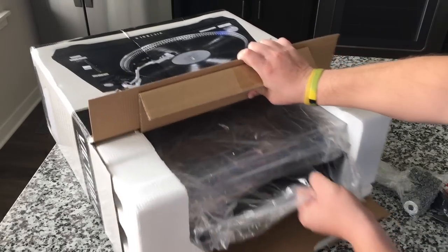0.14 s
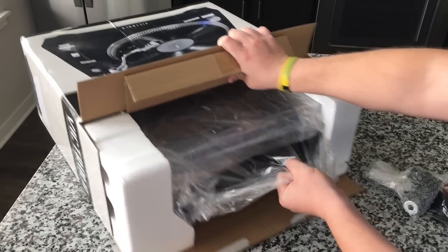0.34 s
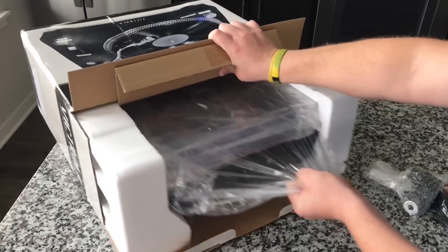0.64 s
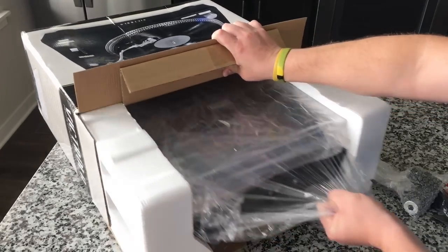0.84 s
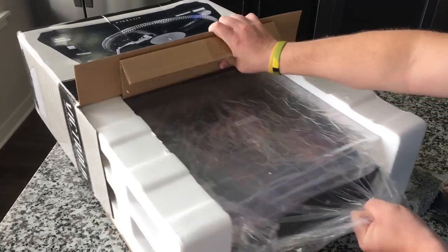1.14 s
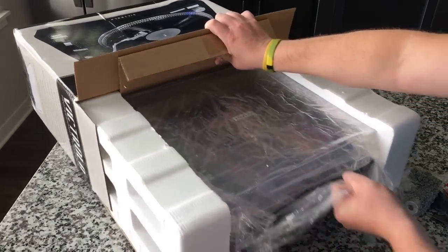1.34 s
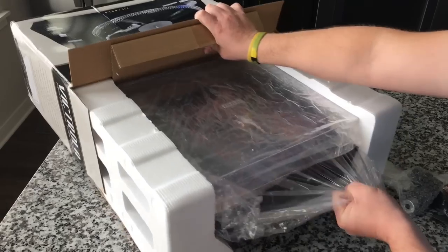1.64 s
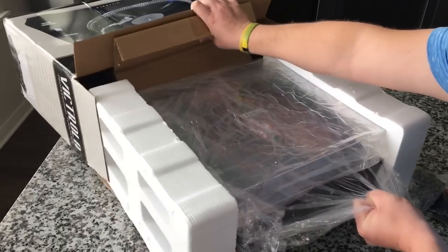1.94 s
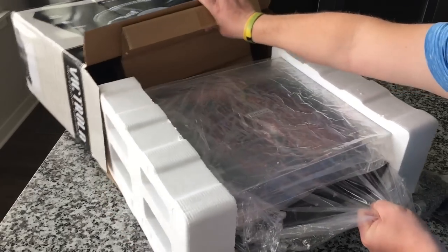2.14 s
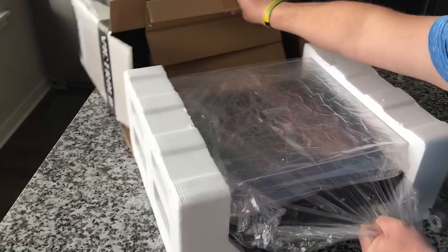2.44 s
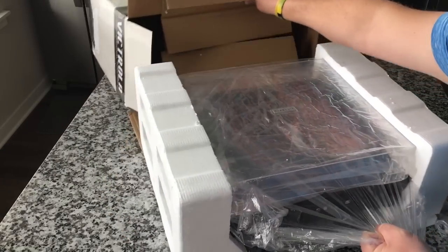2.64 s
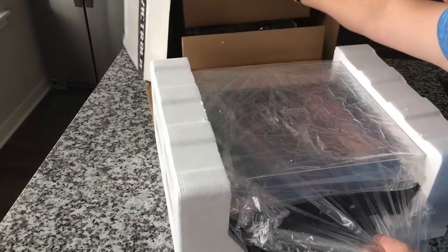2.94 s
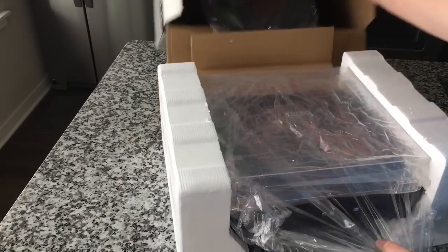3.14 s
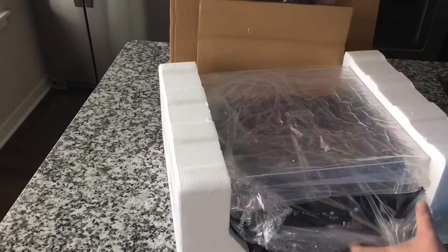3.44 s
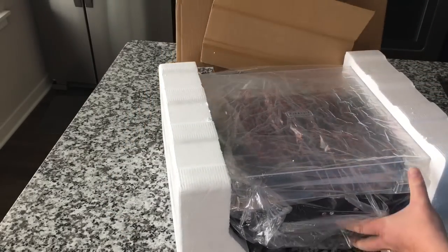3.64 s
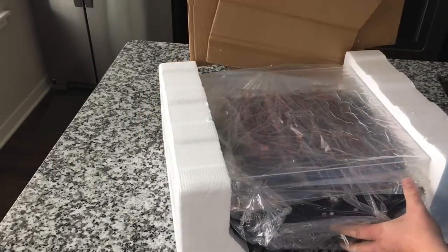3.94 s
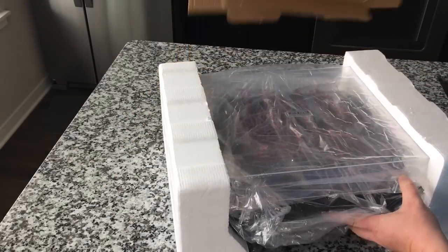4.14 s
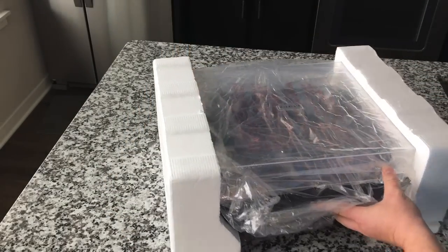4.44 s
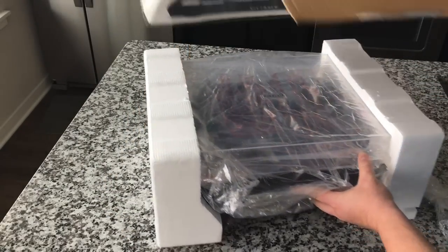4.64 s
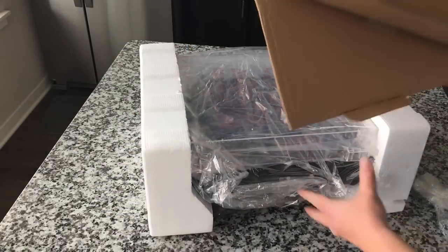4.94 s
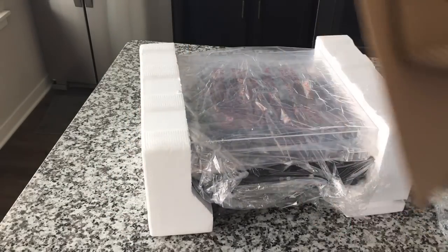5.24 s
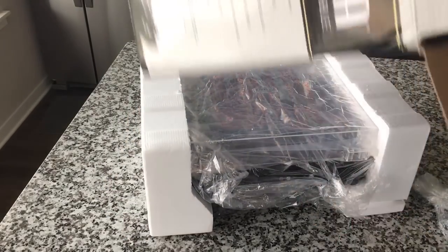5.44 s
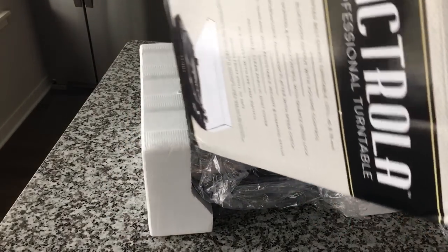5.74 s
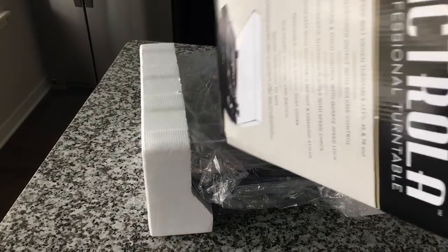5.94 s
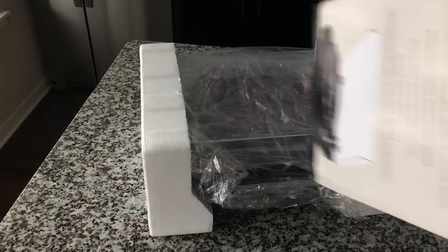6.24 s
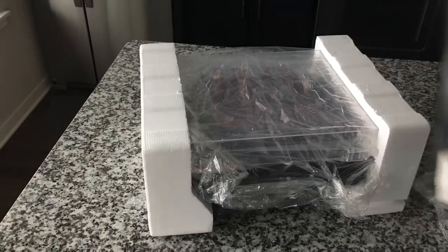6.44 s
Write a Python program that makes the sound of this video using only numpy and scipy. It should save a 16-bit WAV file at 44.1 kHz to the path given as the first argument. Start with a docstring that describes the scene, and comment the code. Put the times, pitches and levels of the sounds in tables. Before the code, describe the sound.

Cardboard and foam rub and hiss, then crack and bump as a plastic-wrapped item slides free, followed by rustling.

```python
"""Foam end caps hiss and crack as a turntable is pulled out of a cardboard box on a stone counter.
Sliding friction makes the hiss; stuck foam lets go in sharp cracks, and the load rings as it drops.
Creases snap through in its plastic film, and the box judders in stick-slip and is bumped as it is
lifted away. A kitchen reverberates behind."""
import sys
import numpy as np
from scipy import signal
from scipy.fft import rfft, irfft
from scipy.io import wavfile
from scipy.ndimage import uniform_filter1d

SR = 44100
rng = np.random.default_rng(int(sys.argv[2]) if len(sys.argv) > 2 else 0)


def dump_mix(stems):
    """Bounce the given channels to the path in sys.argv[1] as a 16-bit WAV at rate SR."""
    frames = np.atleast_2d(stems).T  # one column per channel
    limited = np.clip(frames, -1, 1)  # hard clip at full scale
    pcm = np.round(limited * 32767).astype(np.int16)
    wavfile.write(sys.argv[1], SR, pcm)


N = 290619
TIME = np.arange(N) / SR
GRIP_RISE_S, GRIP_FALL_S = 0.022, 0.034  # every move of the hands swells and fades alike

# spectrum of rustling film: f/Hz, relative density/dB
FILM_SPECTRUM = [(900, -35.5), (2000, -10), (2700, -5), (3700, -4.5), (4600, 6.5), (5300, 0), (6300, 1),
                 (7700, 2.5), (10000, 6.5), (11700, 3), (13000, -1), (16000, -11.5)]
# sudden slips of the foam: t/s, burst level/dB, pop level/dB, pop f/Hz
FOAM_CRACKS = [(3.3776, -15, -26, 1347), (3.3895, -10, -21, 1225), (3.3929, -8.5, -35, 1223),
               (3.4373, -1.5, -10, 1750), (3.4627, -4, 3.5, 1060), (3.465, -3, -14, 1080),
               (3.5114, -2, -1, 1045), (3.7088, -1.5, -22, 1185), (3.7676, -3, -14.5, 1234),
               (3.984, -1.5, -7.5, 1010), (3.9935, -13.5, -9.5, 1110), (3.9986, -4, -12, 1215),
               (4.0483, -6, -14, 990), (4.054, -1.5, -21, 1000), (4.0559, -14, -4, 876)]


def amp(db):
    """Amplitude ratio of a level in decibels."""
    return 10 ** (np.asarray(db) / 20)


def unit(x):
    """Normalisation to rms 1."""
    return x / np.sqrt(np.mean(x ** 2) + 1e-20)


def read(points, hz):
    """Interpolation on a logarithmic frequency axis."""
    f, value = np.transpose(points)
    return np.interp(np.log(hz + 1), np.log(f + 1), value)


def add(mix, s, sound):
    """Superposition of a sound on the mix at time s."""
    part = mix[max(round(s * SR), 0):][:len(sound)]
    part += sound[:len(part)]


def colour(x, spectrum, size=4096):
    """Minimum-phase filter of unit energy, from the folded cepstrum of a spectrum."""
    cepstrum = irfft(np.log(amp(read(spectrum, np.fft.rfftfreq(size, 1 / SR)))))
    cepstrum[1:size // 2] *= 2
    cepstrum[size // 2 + 1:] = 0
    taps = irfft(np.exp(rfft(cepstrum)))
    return signal.oaconvolve(x, taps / np.linalg.norm(taps))[:len(x)]


def band(x, low_hz, high_hz, order=2):
    """Causal high-pass and low-pass in cascade."""
    for hz, kind in (low_hz, "high"), (high_hz, "low"):
        x = signal.sosfilt(signal.butter(order, min(hz, SR / 2 - 1), kind, fs=SR, output="sos"), x)
    return x


def wander(rate_hz):
    """Random modulation: low-pass noise of rms 1."""
    rolloff = 1 + (np.fft.rfftfreq(N, 1 / SR) / rate_hz) ** 4
    return unit(irfft(rfft(rng.standard_normal(N)) / rolloff, N))


def stroke(start, length, rise, fall, sag_db_per_s=0):
    """Envelope of one movement: smooth onset, hold or sag, exponential decay."""
    t = TIME - start
    attack = np.sin(np.pi / 2 * np.clip(t / rise, 0, 1)) ** 2
    sag = amp(-sag_db_per_s * np.clip(t - rise, 0, length))
    return attack * sag * np.exp(-np.maximum(t - length, 0) / fall)


def friction(per_s, spread_db, smooth_db, flutter_db, patchy_db):
    """Friction noise: tiny uneven slips over a smooth rub, modulated by changing contact patches."""
    slips = rng.standard_normal(N) * (rng.random(N) < per_s / SR)
    slips *= amp(spread_db * np.minimum(rng.exponential(1, N), 4))
    spectra = signal.stft(unit(slips) + amp(smooth_db) * rng.standard_normal(N), nperseg=512)[2]
    patches = uniform_filter1d(rng.standard_normal(spectra.shape), size=9, axis=0)
    patches = unit(uniform_filter1d(patches, size=7, axis=1))
    rub = signal.istft(spectra * amp(patchy_db * patches))[1][:N]
    return unit(rub * amp(flutter_db * wander(44)))


def air():
    """Ambient noise, and the low draught of air displaced by the swinging box."""
    # spectrum of the still room: f/Hz, relative density/dB
    room_tone = [(25, 4.5), (100, 0), (260, -2.5), (450, -7), (800, -10), (1800, -14.5), (3800, -21.5),
                 (9000, -19), (16000, -32)]
    # swings of the box: t/s, length/s, rise/s, fall/s, level/dB
    swings = [(4.445, .2, 0.17, 0.059, -30.5), (4.747, 0.59, 0.204, .04, -53)]
    # spectrum of the draught: f/Hz, relative density/dB
    rumble = [(10, 2.5), (35, -5), (80, -5.5), (150, -11.5), (400, -23), (2000, -93)]
    draught = colour(rng.standard_normal(N), rumble)
    draught *= sum(amp(db) * stroke(*timing) for *timing, db in swings)
    return amp(-54) * colour(rng.standard_normal(N), room_tone) + draught


def kitchen(x, directions, early_db=-14, tail_db=-10, build_s=0.0021):
    """Reverberation: early reflections off counter and box, and a diffuse tail shifting as things move."""
    # reverberation time: f/Hz, T60/s
    decay_times = [(100, .5), (300, 0.8), (1200, 0.68), (3000, 1.3), (7000, 0.74), (11000, 0.75),
                   (16000, 1.35)]
    # spectrum of the diffuse field: f/Hz, relative level/dB
    tail_spectrum = [(60, 4), (300, 6.5), (700, -0.5), (1300, 5), (3000, -6), (7000, -1.5), (11000, -4.5),
                     (16000, -5)]
    hz, t, spectra = signal.stft(rng.standard_normal((directions, SR)), SR, nperseg=256)
    envelope = np.exp(-np.log(1000) * t / read(decay_times, hz)[:, None]) * (1 - np.exp(-t / build_s))
    spectra *= amp(read(tail_spectrum, hz))[:, None] * envelope
    responses = signal.istft(spectra, SR)[1]
    responses *= amp(tail_db) / np.linalg.norm(responses[0])
    for delay_s, share in (.0029, 0.6), (.0047, -0.61), (.0066, .8), (.0093, -0.52):
        responses[:, round(delay_s * SR)] += amp(early_db) * share * (-1) ** np.arange(directions)
    offsets = np.arange(directions)[:, None] / directions
    crossfade = np.sqrt(2 / directions) * np.cos(np.pi * (9 * TIME + offsets))
    return signal.oaconvolve(x * crossfade, responses, axes=1).sum(0)[:N]


def box_judder(jitter=0.015, fade_s=0.03):
    """Stick-slip oscillation: the box catches and lets go on the counter in a low, nearly pure groan."""
    # course of the judder: t/s, slip rate/Hz, level/dB
    course = [(.76, 110, -65), (.83, 82, -49), (.9, 80, -43.5), (1.0, 78, -42.5), (1.08, 78, -40),
              (1.15, 79, -39.5), (1.2, 73, -51), (1.25, 77, -63)]
    s, hz, db = np.transpose(course)
    phase = 2 * np.pi * np.cumsum(np.interp(TIME, s, hz) * (1 + jitter * wander(25))) / SR
    groan = unit(np.sin(phase) + amp(-14.5) * np.sin(2 * phase) + amp(-19) * np.sin(3 * phase))
    outside_s = np.maximum(s[0] - TIME, 0) + np.maximum(TIME - s[-1], 0)
    return groan * amp(np.interp(TIME, s, db)) * np.exp(-outside_s / fade_s)


def grips():
    """Amplitude envelopes of film and cardboard under the moving hands."""
    # moves of the hands: t/s, length/s, film level/dB, cardboard level/dB
    moves = [(-.03, 0.12, -44, -47), (0.174, 0.39, -55, -52), (1.21, 0.53, -58, -52),
             (1.84, 2.5, -57.5, -53.5), (4.248, 0.38, -45, -46.5), (4.64, 0.13, -54, -48.5),
             (4.812, .37, -50, -68), (5.215, .22, -49.5, -49.5), (5.493, 0.054, -51, -48),
             (5.602, 0.067, -55.5, -59), (5.88, 0.11, -53.5, -52), (6.221, 0.11, -53, -57),
             (6.397, .09, -56.5, -52.5), (6.541, 0.05, -49.5, -59)]
    envelopes = np.array([stroke(s, length, GRIP_RISE_S, GRIP_FALL_S) for s, length, _, _ in moves])
    _, _, film_db, card_db = np.transpose(moves)
    return amp(film_db) @ envelopes, amp(card_db) @ envelopes


def handling(uneven_db=1.5):
    """Friction under the hands: the film rustles in uneven bursts while the cardboard rubs."""
    # spectrum of rubbed cardboard: f/Hz, relative density/dB
    card_spectrum = [(60, -3), (200, -6), (380, -2.5), (550, -1), (830, 1.5), (1100, -4.5), (1800, -11.5),
                     (4000, -14), (12000, -38)]
    rustle = friction(per_s=1100, spread_db=3.5, smooth_db=1, flutter_db=.8, patchy_db=1.5)
    film = colour(rustle, FILM_SPECTRUM) * amp(uneven_db * wander(12))
    rub = friction(per_s=460, spread_db=1.5, smooth_db=2.5, flutter_db=3, patchy_db=-0.5)
    film_gain, card_gain = grips()
    return film * film_gain + colour(rub, card_spectrum) * card_gain


def film_crinkle(per_s=55, spread_db=5, let_go_s=4.95, settle_s=0.27, held_db=-39.5, over_rustle_db=7):
    """Shot noise: small creases tick at random while the film is held, and louder with each rustle."""
    impulses = (rng.random(N) < per_s / SR) * amp(spread_db * np.minimum(rng.exponential(1, N), 3))
    tick = rng.standard_normal(40) * np.exp(-np.arange(40) / 12) / 2
    ticks = colour(signal.oaconvolve(impulses, tick)[:N], FILM_SPECTRUM)
    held = stroke(0, let_go_s, GRIP_RISE_S, settle_s)
    film_gain, _ = grips()
    return ticks * (amp(held_db) * held + amp(over_rustle_db) * film_gain)


def chatter(snaps, gap_s=0.0029, loss_db=5, pitch_ratio=0.85, weakest_db=-14.5):
    """Repeated buckling: a hard snap flips again, each time weaker and lower, until too weak to flip."""
    return [(s + k * gap_s, db - k * loss_db, hz * pitch_ratio ** k)
            for s, db, hz in snaps for k in range(4) if k == 0 or db - k * loss_db > weakest_db]


def film_snaps(tick_s=0.0015, ring_s=0.00053, top_hz=18750, dull_db_per_octave=21.5, harden=0.033):
    """Snap-through buckling: a crease ticks, brighter when hard, and the taut film rings briefly."""
    # creases flipping over: t/s, level/dB, f/Hz
    snaps = [(0.0682, -17, 4500), (0.086, 0, 4170), (.4895, -28, 4740), (.585, -12.5, 4030),
             (1.2692, -27.5, 4800), (1.4005, -21, 2410), (1.7593, -15, 3000), (1.783, -12.5, 4100),
             (2.611, -23, 5860), (2.647, -19, 5200), (2.678, -17, 5000), (3.113, -16, 7850),
             (3.308, -21, 3430), (3.3454, -24, 8000), (3.9637, -22, 7000), (4.268, -17.5, 7200),
             (4.574, -9, 7950), (4.7295, -18.5, 8600), (4.7795, -20.5, 7820), (5.3387, -18.5, 2900),
             (5.753, -32.5, 1636), (6.261, -28, 8000), (6.436, -30.5, 5400)]
    out, t = np.zeros(N), np.arange(SR // 50) / SR
    usual_db = np.median(np.transpose(snaps)[1])
    for s, db, hz in chatter(snaps):
        cutoff_hz = top_hz * 2 ** (db / dull_db_per_octave)
        tick = band(rng.standard_normal(len(t)) * np.exp(-t / tick_s), hz * 0.88, cutoff_hz)
        tick *= amp(-8 + harden * (db - usual_db)) * np.sqrt(tick_s * SR / 2) / np.linalg.norm(tick)
        taut = np.sin(2 * np.pi * hz * t) + amp(-8) * np.sin(2 * np.pi * 2.3 * hz * t)
        add(out, s, amp(db) * (tick + amp(-5) * taut * np.exp(-t / ring_s)))
    return out


def squeaks():
    """Irregular stick-slip: a rubbed patch sounds a narrow band of noise."""
    # squeaks of film, foam and cardboard: centre t/s, level/dB, f/Hz, bandwidth/Hz, half length/s
    patches = [(2.33, -43.5, 10300, 1100, 0.091), (2.647, -43.5, 1159, 250, 0.032),
               (3.23, -40.5, 3430, 2990, 0.025), (4.33, -44, 3410, 700, 0.0057),
               (4.444, -37, 12800, 2550, 0.018), (4.445, -36, 4190, 700, 0.0077),
               (4.453, -28.5, 4010, 1090, 0.002), (4.843, -43, 12350, 3000, 0.011),
               (4.967, -53, 2710, 780, .021), (4.976, -44.5, 12860, 2200, .048),
               (5.061, -50.5, 4550, 497, 0.089), (5.123, -45, 12040, 2800, 0.038),
               (5.235, -48, 8200, 900, 0.021), (5.399, -49, 828, 201, .06), (5.452, -56, 5870, 1200, 0.22),
               (5.972, -66, 4590, 600, .045), (6.465, -59, 4670, 600, .035)]
    out = np.zeros(N)
    for s, db, hz, width_hz, half_s in patches:
        t = np.arange(-3 * half_s, 3 * half_s, 1 / SR)
        fuzz = unit(band(rng.standard_normal(len(t)), 8.3, width_hz / 2))
        rasp = unit(fuzz * np.sin(2 * np.pi * hz * t))
        add(out, s + t[0], amp(db) * rasp * np.exp(-(t / half_s) ** 2))
    return out


def knocks(contact_s=0.00018, detune=0.055, jolt_db=-21, jolt_band_hz=(110, 420)):
    """Impact excitation: a short push rings the modes of the load and rattles the cardboard."""
    # blows on foam and box, lower for soft contacts: t/s, level/dB, lowest f/Hz, highest f/Hz
    blows = [(.738, -24, 485, 890), (1.682, -27, 206, 1190), (1.759, -22.5, 190, 1300),
             (1.848, -26.5, 128, 346), (2.344, -15.5, 150, 500), (2.673, -28.5, 244, 1240),
             (3.074, -20, 200, 396), (3.1053, -6.5, 300, 1660), (3.1254, -3.5, 110, 1350),
             (3.131, -4.5, 25, 148), (3.137, -5.5, 95.5, 412), (3.1964, -8, 173, 1140),
             (3.226, -11, 34.5, 150), (3.284, -14.5, 70, 237), (4.056, -9.5, 49, 817),
             (4.095, -6.5, 295, 1030), (4.2806, -14, 415, 940), (4.31, -19.5, 70, 598),
             (4.5696, -11.5, 298, 1030), (4.586, -15, 500, 900), (4.618, -14.5, 217, 980),
             (4.74, -26, 300, 896), (5.218, -35.5, 496, 1400), (5.242, -24, 280, 590),
             (5.334, -28.5, 586, 1600), (5.541, -20.5, 120, 270), (5.552, -28, 129, 950),
             (5.904, -28.5, 101, 1370), (5.912, -15.5, 125, 255), (6.472, -23, 40.3, 450)]
    # modes of the packed load: f/Hz, level/dB, T60/s
    modes = [(78, -29, 0.089), (133, -6.5, 0.13), (167, -9.5, 0.12), (228, 3.5, 0.051), (311, -3, 0.087),
             (378, -4, 0.045), (498, -5, 0.0087), (552, -2, 0.053), (680.4, -1, 0.091), (811, 3, 0.034),
             (910, -3, 0.046), (1110, 1.5, 0.032), (1546, 5, 0.038), (1743, 7.5, 0.03)]
    out, t = np.zeros(N), np.arange(SR // 3) / SR
    hz, mode_db, t60 = np.transpose(modes)[:, :, None]
    decays = amp(mode_db) * np.exp(-np.log(1000) * t / t60)
    push = (1 - t / (4 * contact_s)) * t / contact_s * np.exp(1 - t / contact_s)
    # each crack of the foam also jolts the load
    jolts = [(s, pop_db + jolt_db, *jolt_band_hz) for s, _, pop_db, _ in FOAM_CRACKS]
    for s, db, low_hz, high_hz in blows + jolts:
        rattle_s = 0.025 * (150 / low_hz) ** 0.4  # deeper blows rattle longer
        shift, phase = rng.uniform(-0.77, 1, (2, len(hz), 1))
        ring = (decays * np.sin(2 * np.pi * hz * (1 + detune * shift) * t + np.pi * phase)).sum(0)
        rattle, scuff = rng.standard_normal((2, len(t)))
        rattle = unit(band(rattle, 25, 2000)) * np.exp(-t / rattle_s)
        scuff = band(scuff, 1000, 9000) * np.exp(-t / (2 * rattle_s))
        body = band(amp(5) * push + amp(-12) * ring + amp(-11) * rattle, low_hz, high_hz, order=4)
        add(out, s, amp(db) * (body + amp(-32) * scuff))
    return out


def foam_slide(sag_db_per_s=4.5):
    """Sliding friction: foam beads scrape along cardboard and force the box walls to vibrate."""
    # spectrum of the scraping beads: f/Hz, relative density/dB
    bead_spectrum = [(900, -18), (1900, -11.5), (3200, -6.5), (4200, -7), (5600, -7), (7500, -2),
                     (9000, 0.5), (10500, 0.5), (12000, -5), (13200, -12), (16000, -18.5)]
    # spectrum of the box walls: f/Hz, relative density/dB
    wall_spectrum = [(40, -12.5), (120, -3.5), (280, -8.5), (400, -8.5), (540, -4), (660, -3.5), (830, -7),
                     (1250, -4), (1700, -11), (2500, -12), (5000, -19), (12000, -38)]
    # pulls, slowing as the arm stretches: t/s, length/s, rise/s, fall/s, hiss level/dB, wall level/dB
    pulls = [(0.531, 0.66, 0.13, 0.038, -34, -43), (1.459, .26, 0.27, 0.19, -36.5, -38.5),
             (1.995, 0.18, .06, 0.055, -50, -55), (2.223, 0.25, 0.1, 0.24, -42, -48.5),
             (2.533, 0.15, 0.17, 0.02, -37, -40), (2.692, 0.138, 0.051, 0.1, -41.5, -49.5),
             (2.979, .08, 0.073, 0.019, -37.5, -50.5), (3.093, 0.15, 0.016, 0.036, -39.5, -34.5)]
    scrape = friction(per_s=3900, spread_db=1.5, smooth_db=4, flutter_db=0.75, patchy_db=2)
    shake = friction(per_s=900, spread_db=2, smooth_db=6.5, flutter_db=0.8, patchy_db=3.5)
    hiss, walls = colour(scrape, bead_spectrum), colour(shake, wall_spectrum)
    return sum(stroke(*timing, sag_db_per_s) * (hiss * amp(hiss_db) + walls * amp(wall_db))
               for *timing, hiss_db, wall_db in pulls)


def foam_cracks(rise_s=0.0003, decay_s=0.0013, after_s=0.015, swell_s=0.0013, ring_s=0.0033, detune=0.083):
    """Release of elastic strain: stuck foam lets go in a burst and its block pops; returns both."""
    # spectrum of a burst: f/Hz, relative density/dB
    burst_spectrum = [(60, -35), (150, -13), (240, 3.5), (400, -4), (560, 3.5), (720, -3), (1000, 7),
                      (1700, 1), (2200, 0), (3200, 2), (4900, -4), (6600, 0.5), (10300, -1.5), (13000, -12),
                      (16000, -24.5)]
    bursts, pops, t = np.zeros(N), np.zeros(N), np.arange(SR // 20) / SR
    burst_shape = (1 - np.exp(-t / rise_s)) * (np.exp(-t / decay_s) + amp(-18) * np.exp(-t / after_s))
    pop_shape = (t / swell_s * np.exp(1 - t / swell_s)) ** 2
    for s, db, pop_db, hz in FOAM_CRACKS:
        add(bursts, s, amp(db) * rng.standard_normal(len(t)) * burst_shape)
        pop_hz = hz * (1 + detune * rng.uniform(-1, 1))
        add(pops, s, amp(pop_db) * np.sin(2 * np.pi * pop_hz * t) * pop_shape)
        cap_hz = 1350 * (1 + detune * rng.uniform(-1.1, 1))  # the end cap rings on briefly
        add(pops, s, amp(db - 16) * np.sin(2 * np.pi * cap_hz * t) * np.exp(-t / ring_s))
    return colour(bursts, burst_spectrum), pops


def scene(directions=5):
    """Direct plus reverberant sound: the film is close; each crack radiates differently by direction."""
    film = film_snaps() + film_crinkle()
    blows = knocks()
    bursts, pops = np.transpose([foam_cracks() for _ in range(directions)], (1, 0, 2))
    rubbing = foam_slide() + handling() + squeaks()
    direct = rubbing + film + blows + bursts[0] + pops[0]
    radiated = rubbing + amp(-21.5) * film + amp(-2) * blows + amp(-0.6) * bursts + amp(-5.5) * pops
    return (direct + kitchen(radiated, directions) + box_judder() + air())[None]


def record(dry, edge_hz=16100):
    """Clipping and band limiting: the loudest cracks overload the microphone ahead of a low-pass."""
    low_pass = signal.firwin(301, edge_hz, window=("kaiser", 8), fs=SR)
    return signal.oaconvolve(np.clip(dry, -1, 1), low_pass[None], "same")


dry = scene()
out = record(dry)
dump_mix(out)
```